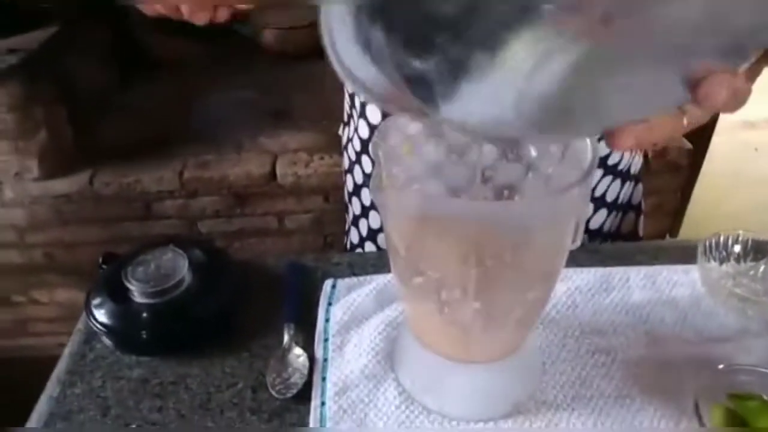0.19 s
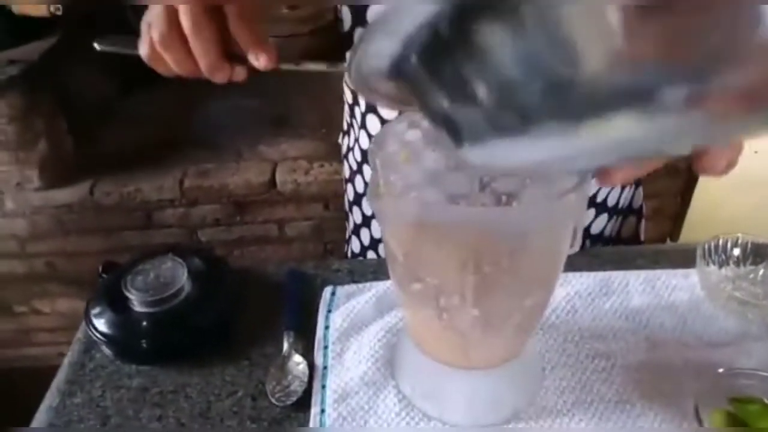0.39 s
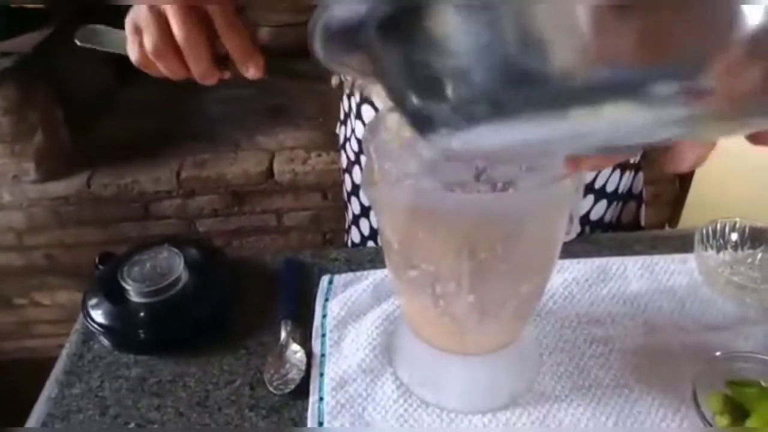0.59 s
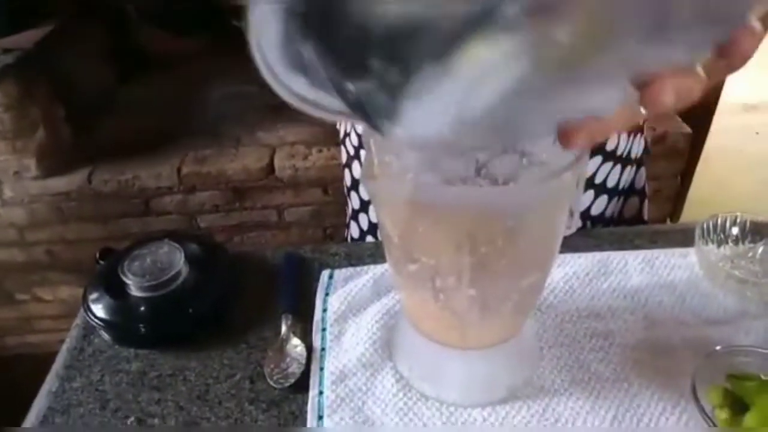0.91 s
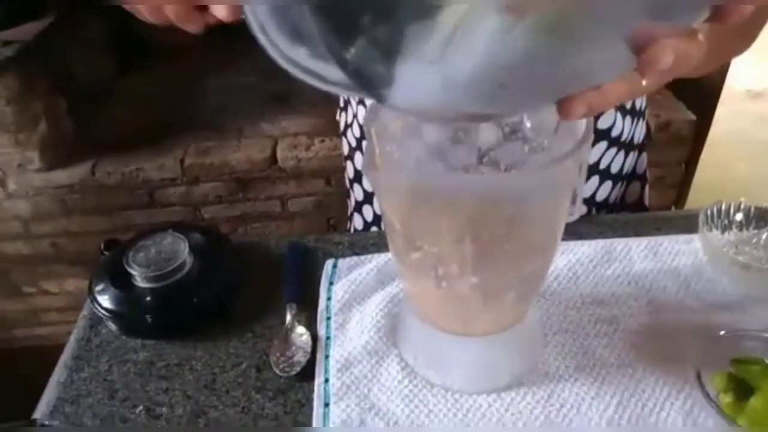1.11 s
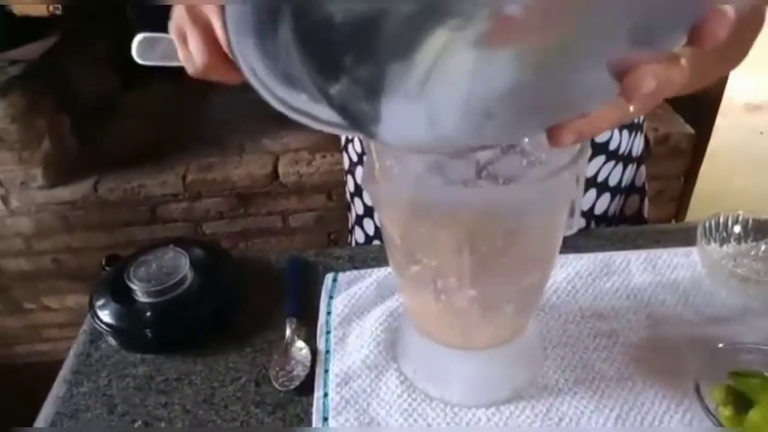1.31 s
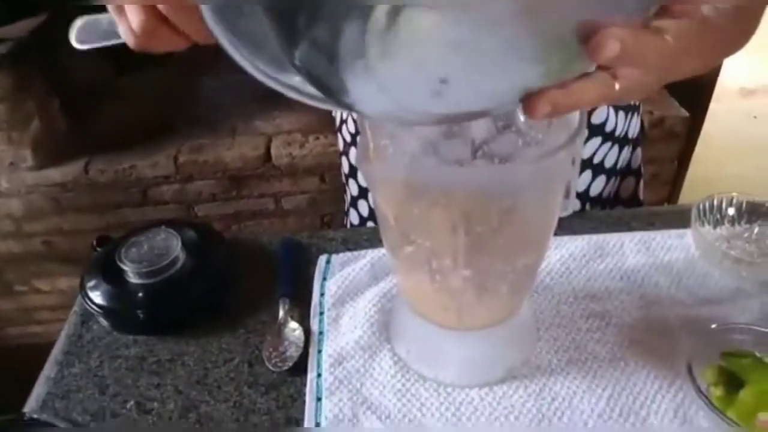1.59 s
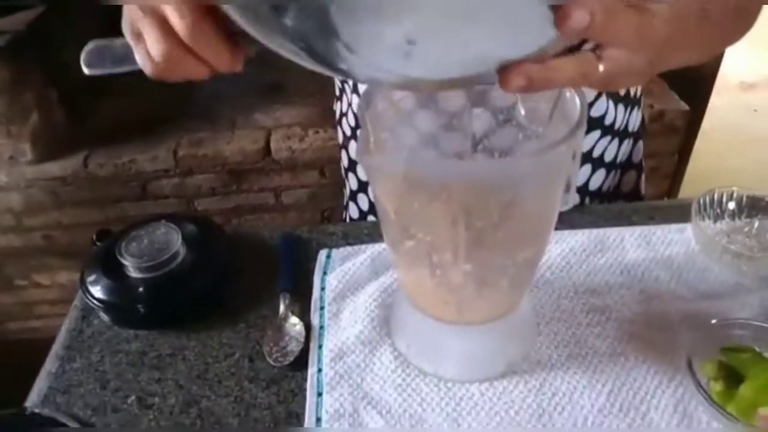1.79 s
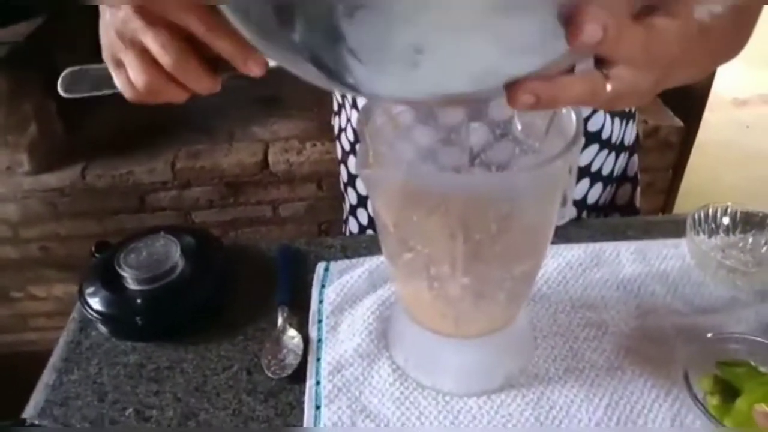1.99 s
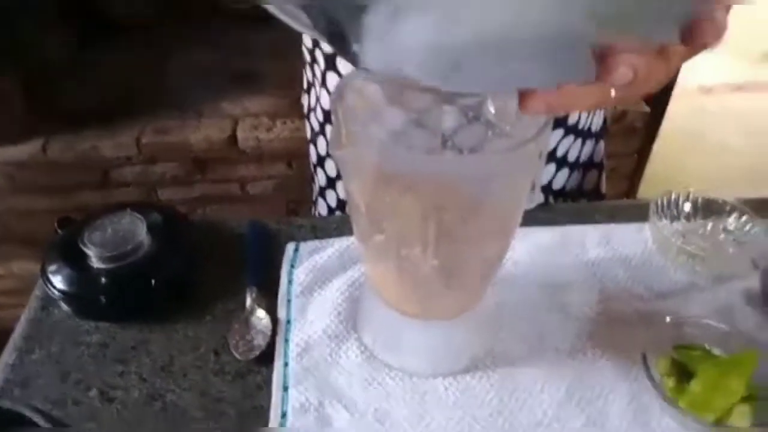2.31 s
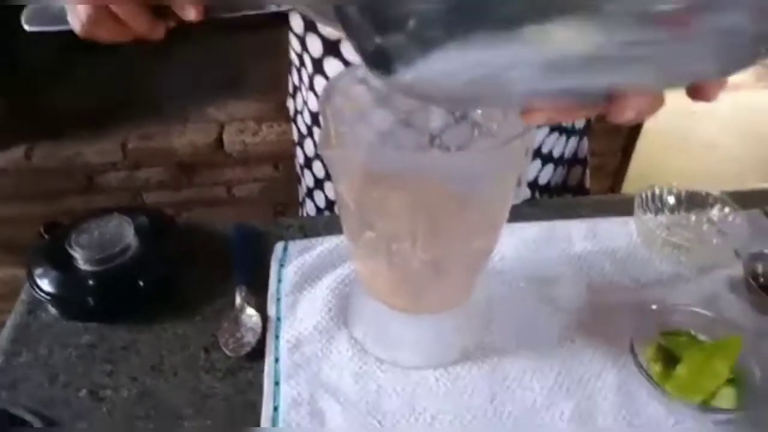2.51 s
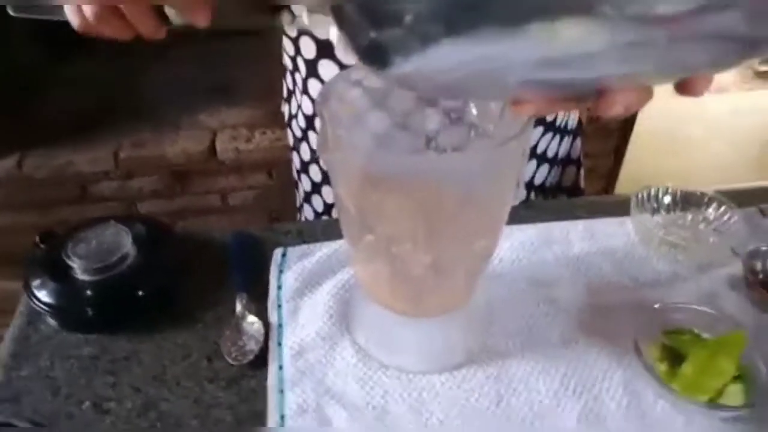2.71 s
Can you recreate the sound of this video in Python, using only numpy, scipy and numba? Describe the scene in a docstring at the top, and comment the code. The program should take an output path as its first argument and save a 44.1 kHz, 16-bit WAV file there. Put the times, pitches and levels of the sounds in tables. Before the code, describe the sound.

A metal spoon knocks and scrapes a hand-held steel bowl, close. An earlier stroke fades; a soft swish at 0.06 s leads to a hard knock at 0.22 and a gritty scrape, then a light tick at 0.5. Clustered knocks and rough scraping run 0.96-1.45. A fainter swish precedes a ringing clank at 1.76, a knock at 2.12, and bright clacks and scraping 2.38-2.6. Faint fridge hum throughout.

```python
"""A metal spoon knocks and scrapes round a hand-held steel bowl in five short strokes, close to a phone.
Impulsive blows and stick-slip friction, both shaped noise, excite the bowl's damped modes.
Two soft swishes, noise comb-filtered by its own echo, lead into strokes.
Behind them a kitchen fridge hums as two wavering sines over faint noise; an earlier stroke dies away."""
import sys
import numpy as np
from scipy import signal
from scipy.fft import rfft, irfft
from scipy.io import wavfile
from scipy.ndimage import uniform_filter1d, map_coordinates
from numba import njit

SR = 44100
rng = np.random.default_rng(int(sys.argv[2]) if len(sys.argv) > 2 else 0)


def persist_wave(psi):
    """Save psi, clipped to +-1, as 16-bit WAV."""
    counts = np.round(np.clip(psi, -1, 1) * 32767).astype(np.int16)
    wavfile.write(sys.argv[1], SR, np.atleast_2d(counts).T)


N = 125685  # samples


def undb(db):
    """Decibel law: 20 dB is a factor of ten in amplitude."""
    return 10 ** (np.asarray(db) / 20)


def unit(x):
    """Normalisation to an rms amplitude of 1."""
    return x / np.sqrt(np.mean(x ** 2))


def band(x, lo_hz, hi_hz):
    """Band-pass filtering with a maximally flat pass band."""
    return signal.sosfilt(signal.butter(2, [lo_hz, hi_hz], "band", fs=SR, output="sos"), x)


def colour(x, table):
    """Spectral shaping: gains in dB interpolated over log frequency."""
    hz, db = np.array(table).T
    f = np.arange(len(x) // 2 + 1) * SR / len(x) + 1
    gain = undb(np.interp(np.log(f), np.log(hz), db))
    return irfft(rfft(x) * gain, len(x))


def walk(rate):
    """Slow random modulation: levels held for 1 / rate s, smoothed twice, rms 1."""
    hold = int(SR / rate)
    steps = np.repeat(rng.standard_normal(N // hold + 1), hold)
    smooth = uniform_filter1d(uniform_filter1d(steps, hold), hold)
    return unit(smooth[:N])


@njit
def sweep(x, hz, width):
    """Time-varying resonance: a state-variable band-pass whose centre moves; width is 1 / Q."""
    y, b, l = np.empty(len(x)), 0., 0.
    for i in range(len(x)):
        g = np.tan(np.pi * hz[i] / SR)
        v = (b + g * (x[i] - l)) / (1 + g * (g + width))
        b, l, y[i] = 2 * v - b, l + 2 * g * v, width * v
    return y


# Spectrum of the room noise. Each row: frequency in Hz, relative density in dB per Hz.
FLOOR_SPECTRUM = [(30, -20.5), (90, -1.5), (170, -4.5), (300, -7.5), (400, -15), (530, -12.5), (900, -29),
                  (2500, -24.5), (5900, -14), (7200, -31.5), (13000, -40.5)]
FLOOR_DB = -60.5


def room_noise():
    """Stationary broadband noise of fixed spectrum, its level wavering slowly."""
    noise = unit(colour(rng.standard_normal(N), FLOOR_SPECTRUM))
    return undb(FLOOR_DB + 1.5 * walk(6.4)) * noise


# Partials of the fridge hum. Each row: frequency in Hz, mean rms level in dB.
HUM_PARTIALS = [(122.4, -54), (244.8, -67)]


def fridge_hum(t):
    """Tonal machine noise: steady sines under slow amplitude modulation."""
    hum = 0
    for hz, db in HUM_PARTIALS:
        sine = np.sqrt(2) * np.sin(2 * np.pi * hz * t)  # rms 1
        hum = hum + undb(db + 0.46 * walk(8.7)) * sine
    return hum


RUMBLE_DB, RUMBLE_FADE_S = -48.5, 0.054  # starting level and time constant
EARLIER_DB, EARLIER_FADE_S = -54.5, 0.077


def earlier_stroke(t):
    """Exponential decay: a low and a high noise band left from an earlier stroke die away."""
    low = unit(band(rng.standard_normal(N), 130, 700))
    high = unit(band(rng.standard_normal(N), 2400, 4100))
    rumble = undb(RUMBLE_DB) * np.exp(-t / RUMBLE_FADE_S) * low
    return rumble + undb(EARLIER_DB) * np.exp(-t / EARLIER_FADE_S) * high


def tail(x, t60):
    """Diffuse reverberation: convolution with decaying noise of energy 1."""
    u = np.arange(SR // 2) / SR
    h = rng.standard_normal(len(u)) * undb(-60 * u / t60)
    return signal.fftconvolve(x, h / np.sqrt(np.sum(h ** 2)))[:N]


# Swishes. Each row: start in seconds, length in seconds, level in dB before fade and comb,
# initial spacing of the bands in Hz.
SWISH_EVENTS = [(0.056, 0.13, -32, 1987), (1.652, 0.13, -44.5, 1580)]
# Spectrum of the swish. Each row: frequency in Hz, relative density in dB per Hz.
SWISH_SPECTRUM = [(710, -20), (1200, -12.5), (1680, -5), (3670, 4.5), (4610, 4), (5740, 5.5),
                  (13000, -27.5)]
SWISH_RISE_S, SWISH_FALL_S, SWISH_FADE_DB = .022, .0075, -13  # the fade runs over the whole length
SWISH_SAG, SWISH_DEPTH = .06, .6  # growth of the echo's delay, amplitude of the echo


def swishes(t):
    """Comb filtering: hiss plus its echo off the bowl has evenly spaced bands, sinking as the delay grows."""
    out, hiss = np.zeros(N), unit(colour(rng.standard_normal(N), SWISH_SPECTRUM))
    for s, length, db, hz in SWISH_EVENTS:
        u = np.clip((t - s) / length, 0, 1)
        delay = SR / hz * (1 + SWISH_SAG * u)  # samples
        echo = map_coordinates(hiss, [t * SR - delay], order=3, mode="wrap")
        rise = np.clip((t - s) / SWISH_RISE_S, 0, 1)
        fall = np.clip((s + length - t) / SWISH_FALL_S, 0, 1)
        envelope = rise * fall * undb(SWISH_FADE_DB * u)
        out += undb(db) * envelope * (hiss + SWISH_DEPTH * echo) / 2
    return out


def damped_mode(force, hz, t60):
    """Damped oscillator: a complex one-pole filter whose free ringing falls 60 dB in t60."""
    pole = np.exp(2j * np.pi * hz / SR - np.log(1000) / (t60 * SR))
    return signal.lfilter([1], [1, -pole], force).imag


# Modes of the bowl. Each row: frequency in Hz, relative drive in dB, 60 dB decay time in seconds.
BOWL_MODES = [(588, -12, 0.22), (867, -10, 0.1), (991, -11, 0.11), (1126, -14, 0.11), (1303, -10, .17),
              (1630, -6, 0.11), (1997, -6, 0.13), (2449, -6, 0.1), (2706, -3, 0.09), (3217, -9, 0.11),
              (4020, -3, 0.08), (4652, -3, 0.07), (5410, -5, 0.09), (6372, -2, 0.08)]


def ring(force, coupling_db):
    """Modal superposition: the force drives every bowl mode through its own coupling."""
    out = 0
    for (hz, db, t60), more_db in zip(BOWL_MODES, coupling_db):
        out = out + damped_mode(force * undb(db + more_db), hz, t60)
    return out


DENSE_T60_S, DENSE_COUPLING_DB, DENSE_PER_S = .08, 6, 20


def dense(force, count=36):
    """High modal density: many small wall modes come and go as the contact moves."""
    out = 0
    places = (np.arange(count) + rng.random(count)) / count
    for hz in 1400 * 6.5 ** places:
        coupling = undb(DENSE_COUPLING_DB * walk(DENSE_PER_S))
        out = out + damped_mode(force * coupling, hz, DENSE_T60_S)
    return out * np.std(force) / np.std(out)


# Treble of the contact force. Each row: frequency in Hz, relative density in dB per Hz.
TREBLE_SPECTRUM = [(1470, 4), (2500, 1), (2960, -7), (3160, 4), (4330, -7), (5470, 4.5), (7950, -13),
                   (12700, -21), (13500, -36.5)]
CONTACT_DB = -5  # contact resonance relative to the plain middle band


def three_bands(force, hz, width):
    """Band decomposition: middle with the contact resonance, treble and bass, each of rms 1."""
    middle = unit(band(force, 700, 3570)) + undb(CONTACT_DB) * unit(sweep(force, hz, width))
    treble = colour(band(force, 2800, 14000), TREBLE_SPECTRUM)
    bass = band(band(force, 51, 680), 140, 580)
    return unit(middle), unit(treble), unit(bass)


# Knocks. Each row: time in seconds, peak of the middle band in dB, then peaks of treble and thud
# relative to it in dB, centre in Hz, drive of the ring relative to it in dB, decay constant of the
# crack in seconds.
KNOCK_EVENTS = [(0.223, -7.5, -9, -22.5, 2130, -14, 0.0084), (0.51, -16.5, 2.5, -32.5, 3760, -9, 0.0032),
                (0.96, -10.5, 0.5, -7.5, 755, -8.5, 0.0051), (0.976, -17.5, -7, -10.5, 1060, -35, 0.0019),
                (1.042, -18, -1, -12.5, 700, -14, 0.0061), (1.062, -17.5, 0.5, -14.5, 700, -20, 0.0057),
                (1.105, -14.5, 2.5, -10, 760, -11, 0.011), (1.147, -8.5, -2, -16, 1000, -5, 0.0029),
                (1.263, -20.5, 1, -18.5, 1100, -1, 0.0056), (1.362, -23.5, 5.5, -20, 970, -9, 0.0032),
                (1.763, -10.5, -4.5, -18, 930, -1.5, 0.006), (1.768, -28, -9, -15, 1160, -11, 0.0035),
                (2.017, -20, -1.5, -32, 1730, -29, 0.0066), (2.121, -14, -0.5, -16.5, 1780, -26, 0.0029),
                (2.377, -7, -4.5, -18, 1280, -33, 0.0028), (2.418, -11.5, -1.5, -24, 950, -5, 0.0016),
                (2.5431, -10, -9.5, -31, 3350, -30, 0.0032), (2.552, -17, 6, -21, 4080, -14, 0.0023)]
KNOCK_RISE_S, THUD_S, KNOCK_WIDTH = 0.00017, 0.036, .2  # width is 1 / Q
KNOCK_SLOPE_DB, KNOCK_SCATTER_DB = 11, 3  # loss per octave from the centre, random spread


def knocks():
    """Impulsive excitation: a noisy crack and thud, and an impulse that wakes most the modes near its centre."""
    out, n = np.zeros(2 * N), SR // 2
    u = np.arange(n) / SR
    rise = 1 - np.exp(-u / KNOCK_RISE_S)
    impulse = 1. * (u == 0)
    mode_hz = np.array(BOWL_MODES)[:, 0]
    for s, db, treble_db, thud_db, hz, ring_db, fall in KNOCK_EVENTS:
        bands = three_bands(rng.standard_normal(n), np.full(n, 1. * hz), KNOCK_WIDTH)
        blow = 0
        for x, part_db, fall_s in zip(bands, (0, treble_db, thud_db), (fall, fall, THUD_S)):
            part = x * rise * np.exp(-u / fall_s)
            blow = blow + undb(part_db) * part / np.abs(part).max()
        scatter_db = KNOCK_SCATTER_DB * rng.standard_normal(len(BOWL_MODES))
        coupling_db = scatter_db - KNOCK_SLOPE_DB * np.abs(np.log2(mode_hz / hz))
        ringing = band(ring(impulse, coupling_db), 210, 9000)
        i = int(s * SR)
        out[i:i + n] += undb(db) * (blow + undb(ring_db) * ringing)
    return out[:N]


SLIPS_PER_S, SLIP_S, SLIP_SHARE = 45, .01, .42  # mean rate, decay constant, weight against the steady rub


def slips(t):
    """Stick-slip: uneven jerks that start sharply and die away over a steady rub."""
    gaps = (.4 + 1.2 * rng.random(int(SLIPS_PER_S * 4))) / SLIPS_PER_S
    when = np.cumsum(gaps)
    when = when[when < t[-1]]
    jerks = np.bincount((when * SR).astype(int), .4 + rng.random(len(when)), N)
    jerks = signal.lfilter([1], [1, -np.exp(-1 / (SLIP_S * SR))], jerks)
    return unit(1 - SLIP_SHARE + SLIP_SHARE * jerks)


# Friction, one list of rows per stroke. Each row: time in seconds, levels of middle, treble and
# lowest mode in dB (middle and treble before slips and chatter), contact resonance in Hz.
STROKE_POINTS = [
    [(0.235, -33, -39.5, -38.5, 1076), (0.263, -36, -38, -39.5, 1003), (0.285, -35.5, -35.5, -37.5, 1480),
     (0.327, -27.5, -27.5, -47, 1620), (0.37, -27, -30.5, -53.5, 1650), (0.41, -32, -38, -57, 1690),
     (0.44, -51, -47.5, -49, 1570), (0.505, -43, -36.5, -62, 1600), (0.56, -91, -44, -64, 1360)],
    [(0.975, -35.5, -32.5, -37, 1134), (1.07, -40.5, -37.5, -35.5, 1115), (1.098, -46.5, -50, -40.5, 900),
     (1.108, -25, -35.5, -42.5, 800), (1.14, -33.5, -29, -48, 937), (1.156, -25.5, -22, -45, 990),
     (1.17, -33.5, -39, -45, 990), (1.255, -48, -41.5, -55, 1106), (1.302, -43.5, -53, -48, 1072),
     (1.354, -56, -46, -58, 1000), (1.366, -43, -39.5, -72, 970), (1.452, -52.5, -39.5, -78, 934),
     (1.49, -70.5, -64.5, -59, 1070)],
    [(1.78, -34, -39.5, -31, 990), (1.834, -45, -48, -29, 1200), (1.898, -47.5, -45, -50, 900),
     (1.92, -47, -33.5, -46, 1006), (1.94, -45, -36, -64.5, 1500), (1.99, -46, -38, -59, 950),
     (2.014, -46.5, -37, -75, 1500), (2.045, -44.5, -38, -61, 962), (2.075, -56, -54, -60, 918)],
    [(2.13, -38, -47, -34.5, 800), (2.146, -53.5, -44.5, -70, 800), (2.186, -57, -51, -45.5, 985),
     (2.238, -82, -62, -64.5, 954), (2.26, -81.5, -60, -75, 1040)],
    [(2.385, -33, -32, -31.5, 1295), (2.411, -50, -47.5, -35.5, 1087), (2.424, -34, -33.5, -35.5, 1250),
     (2.445, -35.5, -36, -31.5, 1400), (2.457, -33, -33.5, -38.5, 2316), (2.495, -36, -31, -45, 2400),
     (2.507, -29.5, -19, -52, 2450), (2.52, -37.5, -26.5, -56, 2450), (2.535, -43.5, -67, -71, 1380),
     (2.563, -46, -48, -71, 1380), (2.62, -63.5, -44.5, -69, 1300)],
]
GRIT_DB, CHATTER_DB, CHATTER_PER_S = 1.5, 1.5, 60
CONTACT_WIDTH, RUB_BASS_DB, LOWEST_WIDTH = .11, -20, .007  # 1 / Q, bass in the middle layer, rms detuning
RING_DB, DENSE_DB = -31, -2  # shares of bowl modes and wall modes
COUPLING_DB, COUPLING_PER_S = 3.5, 20  # the spoon wakes other modes as it travels
CONTACT_SLOPE_DB = 9  # loss per octave from the contact resonance, up to one octave


def scrape(t):
    """Friction excitation: dense uneven grains that chatter, heard directly and through the bowl's modes."""
    rows = np.vstack(STROKE_POINTS)
    contact_hz = np.interp(t, rows[:, 0], rows[:, 4])
    grain_db = GRIT_DB * np.minimum(rng.exponential(size=N), 5)
    grit = rng.standard_normal(N) * undb(grain_db)
    middle, treble, bass = three_bands(grit, contact_hz, CONTACT_WIDTH)
    cycles = BOWL_MODES[0][0] * np.cumsum(1 + LOWEST_WIDTH * walk(29.39)) / SR
    lowest = unit(np.sin(2 * np.pi * cycles))
    bands = middle + undb(RUB_BASS_DB) * bass, treble, lowest

    layers = np.zeros((3, N))
    for stroke in STROKE_POINTS:
        s, *levels_db, _ = np.array(stroke).T
        touch = np.clip((t - s[0]) / .012 + 1, 0, 1) * np.clip((s[-1] - t) / 0.027 + 1, 0, 1)
        for layer, db, x in zip(layers, levels_db, bands):
            layer += touch * undb(np.interp(t, s, db)) * x

    rub = (layers[0] + layers[1]) * slips(t) * undb(CHATTER_DB * walk(CHATTER_PER_S))
    coupling_db = []
    for hz, *_ in BOWL_MODES:
        octaves = np.minimum(np.abs(np.log2(hz / contact_hz)), 1)
        coupling_db.append(COUPLING_DB * walk(COUPLING_PER_S) - CONTACT_SLOPE_DB * octaves)
    return rub + undb(DENSE_DB) * dense(rub) + layers[2] + undb(RING_DB) * ring(rub, coupling_db)


ROOM_DB, ROOM_T60_S, ROOM_DULL_HZ = -16, 0.45, 6400
SIDE_DB, SIDE_PATCHY_DB, SIDE_HZ, SIDE_S = -13, 5.5, 5000, .04  # SIDE_S is a 60 dB decay time


def scene():
    """Superposition of sources and reverberation; only the treble differs between the two channels."""
    t = np.arange(N) / SR
    kitchen = room_noise() + fridge_hum(t) + earlier_stroke(t)
    close = swishes(t) + knocks() + scrape(t)
    room = undb(ROOM_DB) * band(tail(close, ROOM_T60_S), 240, ROOM_DULL_HZ)
    mid = close + room + kitchen
    high_pass = signal.butter(12, SIDE_HZ, "high", fs=SR, output="sos")
    side = signal.sosfilt(high_pass, tail(mid, SIDE_S))
    side = undb(SIDE_DB + SIDE_PATCHY_DB * walk(15)) * side
    return np.array([mid + side, mid - side])


def record(dry):
    """Band limiting: the phone cuts the top above 13.3 kHz with a steep low-pass."""
    return signal.sosfilt(signal.ellip(8, .2, 70, 13300, fs=SR, output="sos"), dry)


dry = scene()
out = record(dry)
persist_wave(out)
```